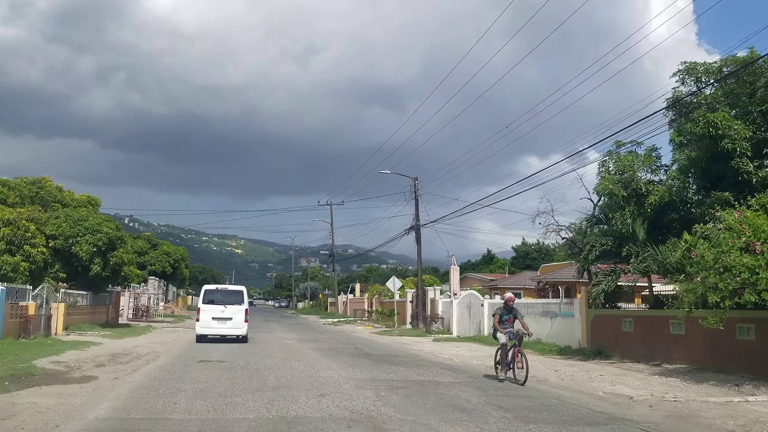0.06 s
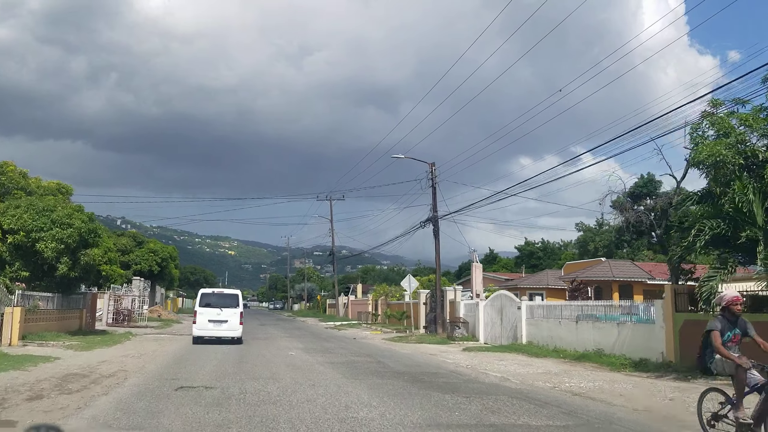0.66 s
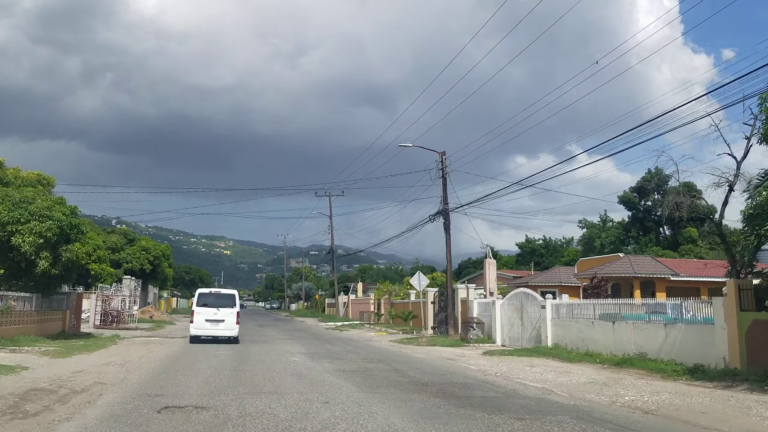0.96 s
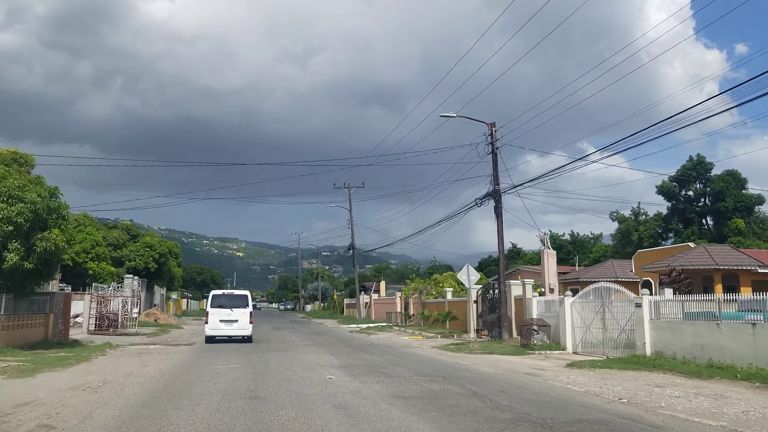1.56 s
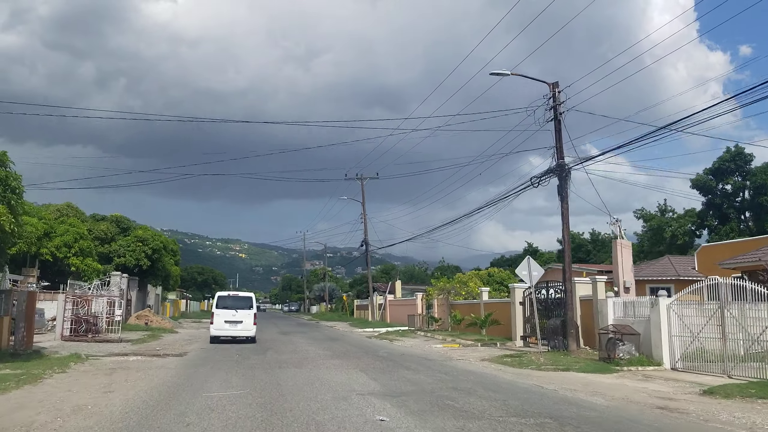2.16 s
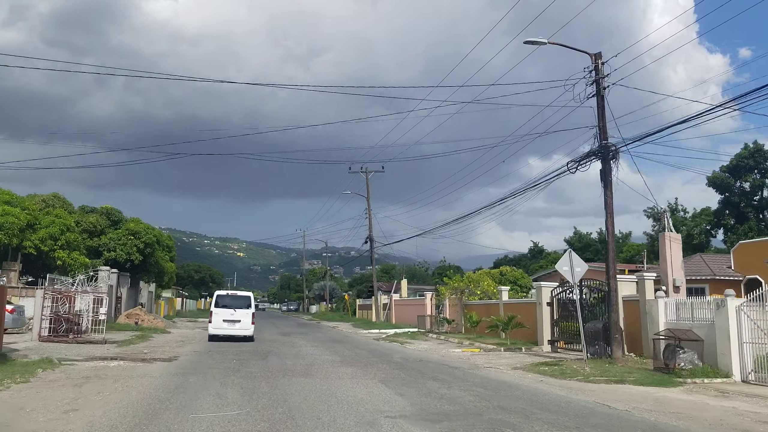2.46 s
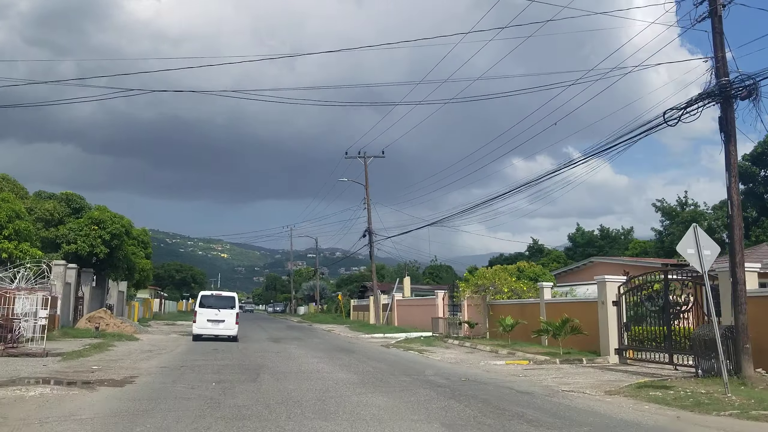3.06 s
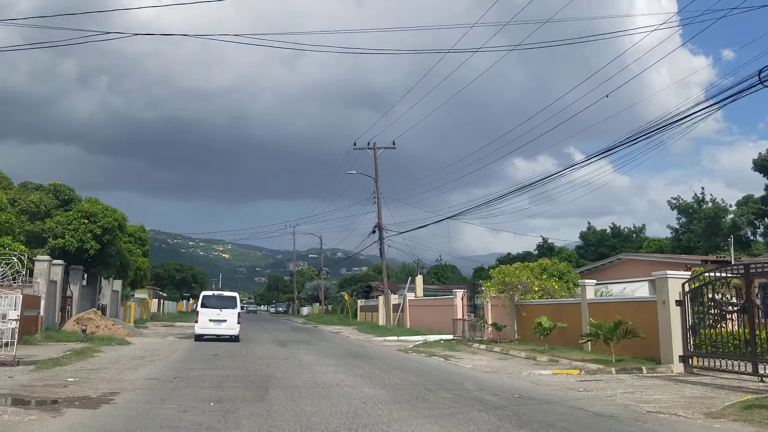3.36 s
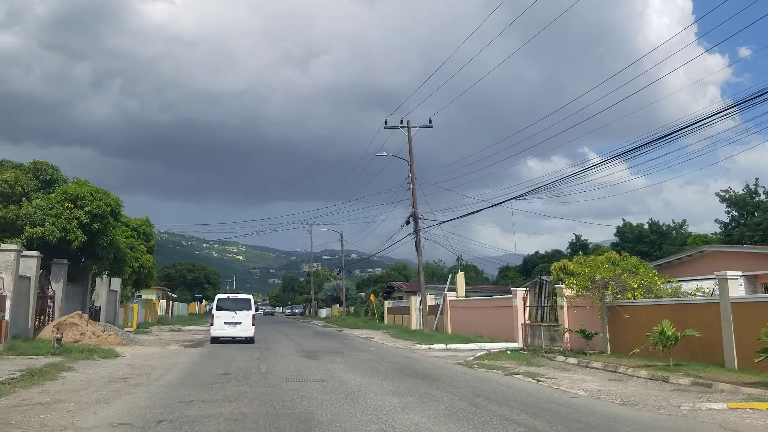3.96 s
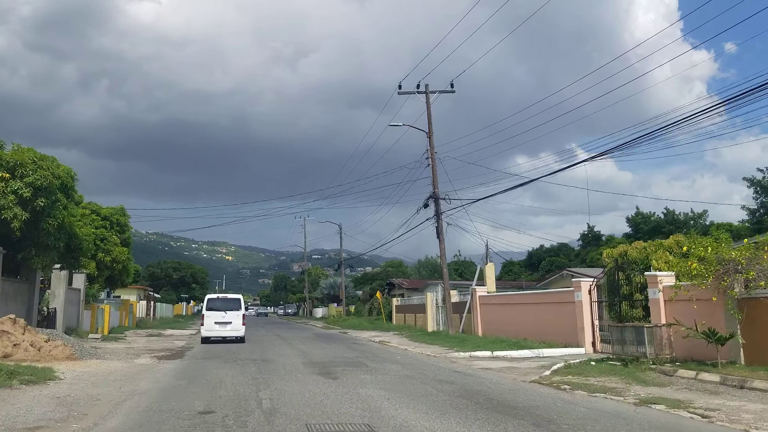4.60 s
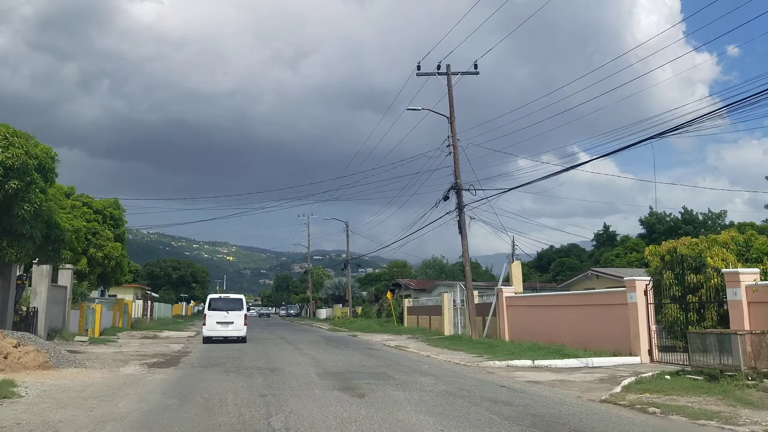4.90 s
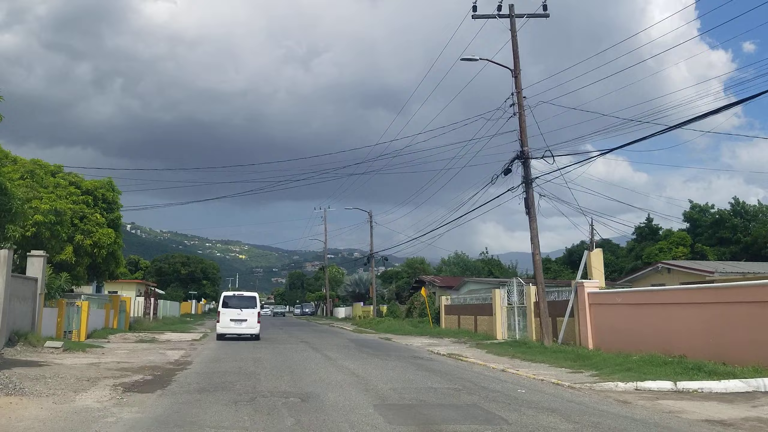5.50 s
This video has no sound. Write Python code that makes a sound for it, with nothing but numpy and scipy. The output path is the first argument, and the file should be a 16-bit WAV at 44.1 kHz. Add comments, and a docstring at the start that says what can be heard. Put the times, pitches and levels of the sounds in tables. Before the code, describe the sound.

The microphone is inside a car rolling slowly along a worn street with the windows shut. Deep tyre rumble, a throbbing cabin boom and a low engine drone last the whole six seconds or so, over a very soft hiss. In the first second, dips give short, deep suspension thumps and the trim knocks lightly. From about 1.9 to 2.8 seconds a rough patch swells the road roar, with more thumps and a cluster of dry panel rattles. A sharp plastic tick comes at 3.2 seconds; the throttle then eases and the engine drops in pitch and level. From about 3.6 seconds a faint, fuzzy tyre whine comes forward. Trim knocks return after 4.2 seconds, strongest around 5.2, followed by another thump at 5.4. Faint, thin rustles and small ticks come and go close by throughout.

```python
"""Inside a car rolling slowly along a worn street, windows shut.
The engine drones through the bulkhead until the throttle is eased and the revs drop.
The tyres rumble and roar, make the cabin boom and leave a faint whine; dips thump the suspension.
Rough patches shake knocks out of the trim. Close by, something rustles and ticks over a soft hiss."""
import sys
import numpy as np
from scipy.fft import rfft, irfft, next_fast_len
from scipy.io import wavfile
from scipy.ndimage import uniform_filter1d, map_coordinates

SR = 44100
rng = np.random.default_rng(int(sys.argv[2]) if len(sys.argv) > 2 else 0)


def persist_wave(psi):
    """Save psi, clipped to +-1, as 16-bit WAV."""
    counts = np.round(np.clip(psi, -1, 1) * 32767).astype(np.int16)
    wavfile.write(sys.argv[1], SR, np.atleast_2d(counts).T)


N = 253134

# trim panel modes: (frequency [Hz], width [Hz], gain [dB])
PANEL_MODES = [(778, 19, 7), (1143, 31, -7), (1327, 63, -0.5), (1520, 360, -8), (1750, 400, -14)]


def amp(db):
    """Decibels to gain."""
    return 10 ** (np.asarray(db) / 20)


def unit(x):
    """Scale to rms 1."""
    return x / np.sqrt(np.mean(x ** 2) + 1e-20)


def curves(rows):
    """One value per sample for each column after the time."""
    s, *cols = np.transpose(rows)
    return [np.interp(np.arange(N) / SR, s, c) for c in cols]


def along(points, hz):
    """Read (frequency [Hz], level [dB]) points on a log frequency axis."""
    f, db = np.transpose(points)
    return np.interp(np.log(hz + 1), np.log(f), db)


def wobble(rate):
    """A smooth random curve, rate knots a second."""
    knots = rng.standard_normal(int(N * rate / SR) + 4)
    return map_coordinates(knots, [np.arange(N) * rate / SR])


def filtered(x, response):
    """x through a complex frequency response."""
    m = next_fast_len(N + SR // 2)
    return irfft(rfft(x, m) * response(np.fft.rfftfreq(m, 1 / SR)), m)[:N]


def noise(points):
    """Noise of rms 1 shaped by (frequency [Hz], level [dB]) points."""
    return unit(filtered(rng.standard_normal(N), lambda hz: amp(along(points, hz))))


def ring(x, modes):
    """x through resonances of alternating sign: (frequency [Hz], width [Hz], gain [dB])."""
    return filtered(x, lambda f: sum((-1) ** k * amp(db) * 1j * f * w / (c * c - f * f + 1j * f * w)
                                     for k, (c, w, db) in enumerate(modes)))


def band(lo_hz, hi_hz):
    """Noise of rms 1 between two steep edges."""
    return unit(filtered(rng.standard_normal(N),
                         lambda f: (f / lo_hz) ** 4 / (1 + (f / lo_hz) ** 4) / (1 + (f / hi_hz) ** 8)))


def even(x, seconds):
    """Noise with its slow swells levelled to rms 1."""
    return x / np.sqrt(np.abs(uniform_filter1d(x ** 2, max(int(seconds * SR), 2))) + 1e-9)


def strikes(times, levels_db, t60, attack):
    """An envelope that jumps at each contact and dies away."""
    out, t = np.zeros(N + SR), np.arange(SR // 4) / SR
    for s, db in zip(times, levels_db):
        out[round(s * SR):][:len(t)] += amp(db - 60 * t / t60) * (1 - np.exp(-t / attack))
    return out[:N]


def tone(hz):
    """A sine of rms 1 that follows a pitch curve."""
    return np.sqrt(2) * np.sin(2 * np.pi * (np.cumsum(hz) / SR + rng.random()))


def air():
    """A steady bed of air hiss in the cabin."""
    # hiss colour: (frequency [Hz], level [dB])
    spectrum = [(300, 4), (900, -1.5), (1500, -5.5), (2000, -9), (3000, -16.5), (4500, -17.5),
                (8000, -21.5), (11000, -24.5), (13500, -24.5), (16000, -21.5)]
    return amp(-69) * noise(spectrum)


def rubbing():
    """The rustle's envelope: a faint chafe that catches and slips, and rubs that swell and fade."""
    # constant chafe: (time [s], level [dB])
    chafe = [(.15, -94), (.45, -80.5), (1.2, -81), (2.8, -82), (3.5, -90.5), (4.4, -82.5), (5.74, -78.5)]
    # single rubs: (peak time [s], length [s], peak level [dB])
    rubs = [(0.569, 0.14, -64), (1.006, 0.19, -67.5), (2.152, 0.24, -72.5), (2.471, 0.087, -77.5),
            (2.643, .1, -69), (2.982, 0.26, -77), (3.37, .08, -75.5), (4.57, 0.17, -67), (4.963, .06, -75),
            (5.292, 0.084, -67), (5.598, 0.057, -66.5)]
    rise_share, fade_db = 0.51, 15.5
    t = np.arange(N) / SR
    power = amp(curves(chafe)[0] + 1.5 * wobble(22)) ** 2
    for s, length, db in rubs:
        from_peak = np.maximum((s - t) / rise_share, (t - s) / (1 - rise_share)) / length
        power += amp(db - fade_db * from_peak) ** 2
    return np.sqrt(power)


def rustle():
    """Light rubbing close by: tiny grains with a thin, high ring."""
    # friction colour: (frequency [Hz], level [dB])
    spectrum = [(2000, -32.5), (3500, -12.5), (4500, -12.5), (5000, -9), (5900, -4.5), (6500, -4.5),
                (7100, -5), (8100, -12), (10000, -26), (11500, -25), (13200, -14.5), (16000, -26)]
    grains = amp(3 * wobble(600))
    hiss = unit(noise(spectrum) * grains)
    ringing = unit(ring(hiss, [(6720, 980, 0)]))
    return rubbing() * unit(hiss + 0.41 * ringing)


def ticks():
    """Hard plastic contacts: a sharp snap with a bright edge and a short tail in the cabin."""
    # contacts: (time [s], snap level [dB], edge level [dB])
    contacts = [(0.949, -54, -81), (2.128, -52.5, -66.5), (3.171, -45, -56.5), (3.1937, -51.5, -70),
                (4.37, -63.5, -88), (4.5137, -57, -81), (4.9503, -51.5, -78), (5.2654, -60, -85),
                (5.277, -56, -79), (5.4926, -57.5, -72.5), (5.5944, -55.5, -64)]
    # snap and tail colour: (frequency [Hz], level [dB])
    spectrum = [(800, -18), (2300, -3), (3800, -15.5), (5200, -6), (6600, 6.5), (7600, -7), (8600, -23.5),
                (11000, -31.5), (16000, -32)]
    s, db, edge_db = np.transpose(contacts)
    snap = strikes(s, db, t60=.014, attack=.0005)
    tail = strikes(s, db - 20, t60=0.17, attack=0.003)
    body = (snap + tail) * even(noise(spectrum), seconds=0.0023)
    edge = strikes(s, edge_db, t60=.014, attack=.0002)
    return body + edge * noise([(11000, -24.5), (13000, 4), (16000, -3.5)])


def whine():
    """A fuzzy rolling whine sinks in pitch and comes forward as the car coasts."""
    # tyre whine: (time [s], pitch [Hz], level [dB])
    glide = [(0, 950, -68), (.5, 955, -70), (.8, 940, -85), (3.25, 835, -73), (3.6, 828, -62.5),
             (4.1, 815, -59.5), (4.7, 800, -59), (5.1, 808, -62), (5.74, 810, -70)]
    pitch_hz, db = curves(glide)
    fuzzy = wobble(40) * tone(pitch_hz) + wobble(40) * tone(pitch_hz * 1.012)
    return amp(db) * even(fuzzy, seconds=.07)


def trim():
    """Each jolt knocks a loose panel: a dry crack, a brief chatter and a dull thud."""
    # jolts: (time [s], chatter drive [dB], thud level [dB])
    knocks = [(0.3, -37.5, -47.5), (0.3398, -46, -42), (0.6424, -45, -48), (1.2676, -52, -47.5),
              (1.939, -43, -37.5), (1.9614, -46, -44), (2.111, -60, -45), (2.191, -47, -39),
              (2.3067, -53, -41.5), (2.352, -43, -37.5), (2.383, -54, -42), (2.55, -45, -50),
              (2.583, -52, -42), (2.628, -44.5, -42.5), (4.2075, -50, -40.5), (4.363, -53, -51),
              (4.537, -52, -45.5), (4.861, -53, -45), (4.9496, -47, -59), (5.013, -52, -41),
              (5.0984, -62, -39), (5.1598, -38, -36.5), (5.185, -30.5, -40.5), (5.266, -43, -42.5),
              (5.429, -50, -45.5), (5.4864, -48, -45), (5.52, -59, -44.5)]
    s, chatter_db, thud_db = np.transpose(knocks)
    typical_knock_db = -44.5
    crack_db = -64.5 + 0.56 * (chatter_db - typical_knock_db)
    crack = strikes(s, crack_db, t60=.045, attack=.0006) * even(band(1000, 3200), seconds=.005)
    chatter = strikes(s, chatter_db, t60=.06, attack=.0005) * even(band(400, 2000), seconds=.003)
    thud = strikes(s, thud_db, t60=.07, attack=.0006) * even(band(330, 950), seconds=.004)
    return crack + ring(chatter, PANEL_MODES) + thud


def bumps():
    """A wheel drops into a dip and the body answers with a short, deep thump."""
    # dips in the road: (time [s], level [dB])
    dips = [(.217, -18.5), (0.299, -24), (.676, -17.5), (1.006, -25.5), (1.942, -21), (2.327, -22.5),
            (2.513, -15), (2.798, -25), (5.436, -21)]
    # suspension and body modes: (frequency [Hz], t60 [s], gain [dB])
    modes = [(50, 0.18, 2.5), (90.5, 0.076, -11), (184, 0.098, -16)]
    out, t = np.zeros(N + SR), np.arange(SR // 3) / SR
    thump = sum(amp(db - 60 * t / t60) * np.sin(2 * np.pi * hz * t) for hz, t60, db in modes)
    soft_attack = 1 - np.exp(-(t / 0.0045) ** 2)
    for s, db in dips:
        out[round(s * SR):][:len(t)] += amp(db) * thump * soft_attack
    return out[:N]


def coarseness():
    """How hard the road shakes the tyres, in dB: the surface plus each patch rolled over."""
    # asphalt grain: (time [s], level over ordinary asphalt [dB])
    surface = [(0, 1.5), (.85, -.5), (1.8, 0.5), (2.85, 1.2), (3.5, -0.8), (4.4, 0.86), (5.74, 3.5)]
    # rough patches: (time [s], length [s], boost [dB])
    patches = [(0.433, 0.21, 3), (1.978, 0.2, 6), (2.302, 0.097, 4.5), (2.505, 0.15, 4), (4.934, 0.062, 2),
               (5.16, 0.14, 3.5), (5.435, 0.077, 3)]
    enter_s, leave_s = .03, 0.08
    boosts = [curves([(s - enter_s, 0), (s, db), (s + length, db), (s + length + leave_s, 0)])[0]
              for s, length, db in patches]
    return curves(surface)[0] + sum(boosts)


def tyres():
    """Coarse asphalt rumbles through the suspension; the tread roars and sets the panels buzzing."""
    # low-end rumble: (frequency [Hz], level [dB])
    rumble_spectrum = [(15, -20), (28, -12), (42, 1), (62, 5), (80, 4.5), (125, 1.5), (170, -1),
                       (220, -5.5), (300, -10), (420, -21.5), (700, -54), (1500, -90.5)]
    # midrange tread roar: (frequency [Hz], level [dB])
    roar_spectrum = [(150, -32), (300, -1), (400, 1), (500, 3), (630, -7), (800, -2), (950, -12.5),
                     (1150, -23), (1350, -21), (1650, -32.5), (2500, -41.5), (5000, -68)]
    coarse_db = coarseness()
    rumble = amp(-37.5 + coarse_db) * even(noise(rumble_spectrum), seconds=.12)
    roar = amp(-54 + 1.09 * coarse_db + 1.5 * wobble(55)) * even(noise(roar_spectrum), seconds=0.21)
    # loose panels only buzz where the road is roughest
    shaking = np.clip((coarse_db - 3.0) / 4, 0, 1)
    buzz = shaking * amp(-63.5 + 4.9 * wobble(90)) * unit(ring(band(700, 1200), PANEL_MODES))
    return rumble + roar + buzz


def boom():
    """The road drives the cabin's lowest air mode, which throbs and drifts in pitch."""
    # boom swells: (time [s], level [dB])
    swells = [(0, -32.5), (.27, -25), (.4, -34.5), (1.65, -29.5), (2.15, -37), (3.27, -31.5), (3.42, -50),
              (3.77, -26.5), (3.95, -49), (4.3, -40), (4.42, -29.5), (5.74, -34)]
    mode_hz, drift_hz, low_cut_hz = 48.62, 3.936, 33
    throb = unit(amp(3 * wobble(20)))
    mode = amp(curves(swells)[0]) * throb * tone(mode_hz + drift_hz * wobble(20))
    return filtered(mode, lambda f: 1 / (1 + (low_cut_hz / (f + 1)) ** 8))


def engine():
    """Ten fluttering firing orders slide through the cabin's resonances as the revs drop."""
    # revs: (time [s], firing rate [Hz])
    revs = [(0, 46.78), (.5, 48.4), (1.1, 49.9), (1.85, 50.95), (2.5, 50.9), (3.2, 51), (3.75, 41.85),
            (4.1, 37.42), (4.5, 36.16), (5.74, 35.42)]
    # engine drive: (time [s], level [dB])
    throttle = [(0, -38), (1.3, -38), (1.6, -34), (2.1, -38.5), (3.25, -38), (3.45, -44.5), (4.1, -46),
                (4.35, -38.5), (4.6, -47), (5.74, -39)]
    # path into the cabin: (frequency [Hz], gain [dB])
    bulkhead = [(36, -11.5), (50, -1), (72, -8), (98, -1.5), (115, -0.5), (150, -9), (200, -14), (250, -27),
                (300, -17.5), (400, -31.5), (500, -30.5)]
    firing_hz = curves(revs)[0] * (1 + .004 * wobble(7))
    orders = sum(amp(along(bulkhead, k * firing_hz) + wobble(10)) * tone(k * firing_hz)
                 for k in range(1, 11))
    return amp(curves(throttle)[0]) * orders


def scene():
    """Engine, road and small cabin noises over the air bed, in mono."""
    return (air() + engine() + boom() + bumps() + tyres() + whine() + trim() + rustle() + ticks())[None]


def record(dry):
    """A brick-wall high cut takes off the very top."""
    high_cut_hz = 15750
    return filtered(dry[0], lambda hz: hz < high_cut_hz)[None]


dry = scene()
out = record(dry)
persist_wave(out)
```